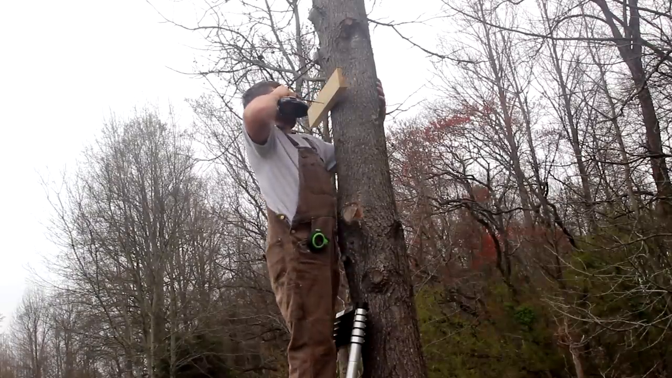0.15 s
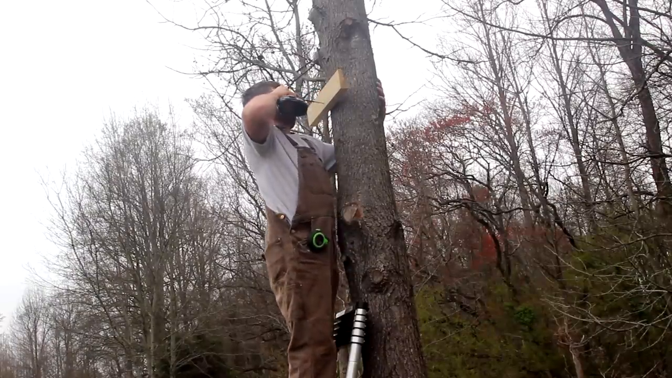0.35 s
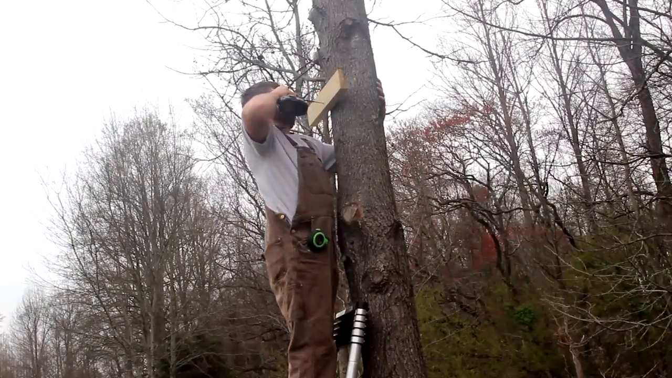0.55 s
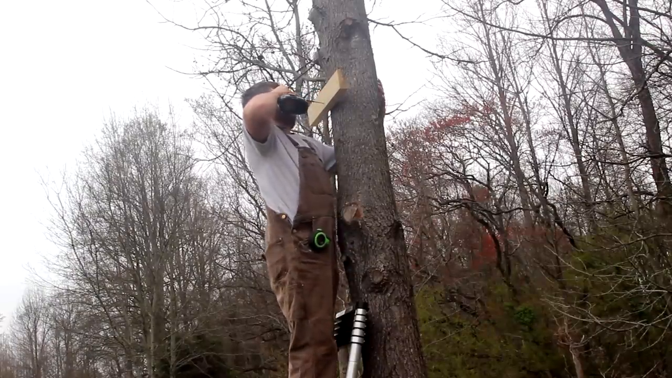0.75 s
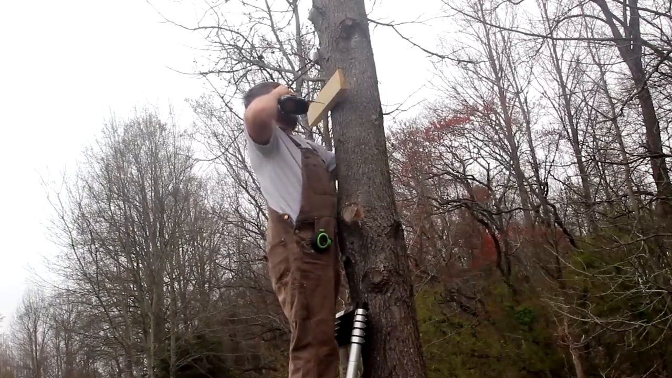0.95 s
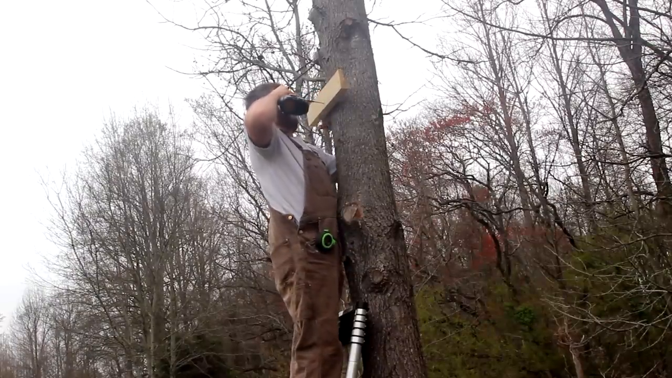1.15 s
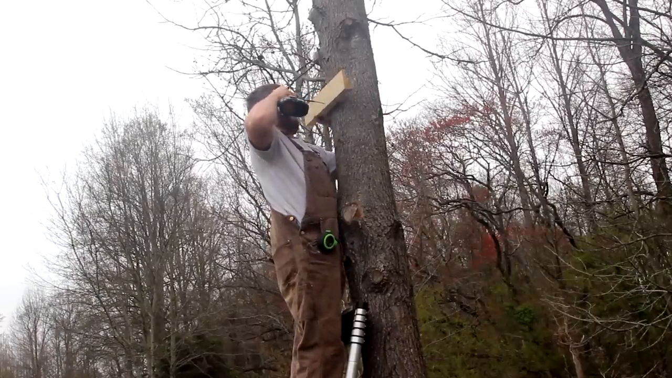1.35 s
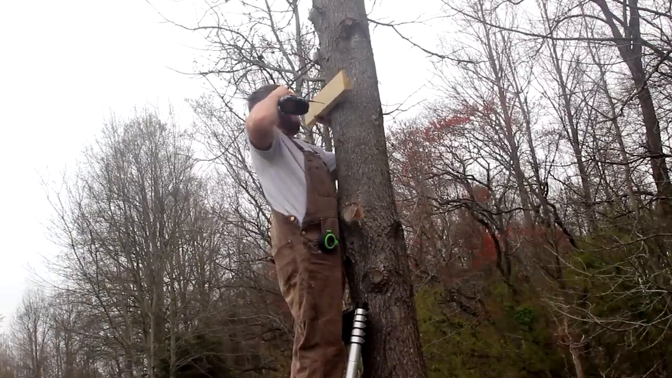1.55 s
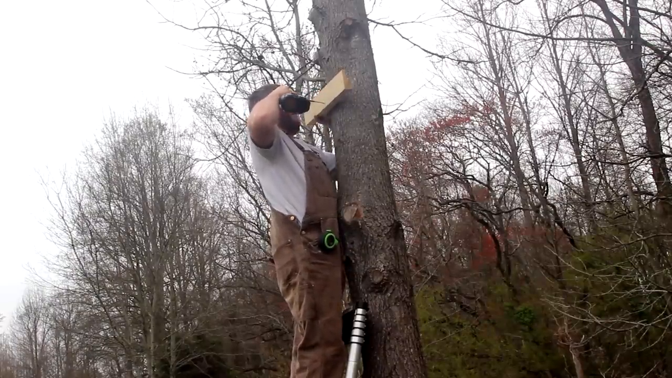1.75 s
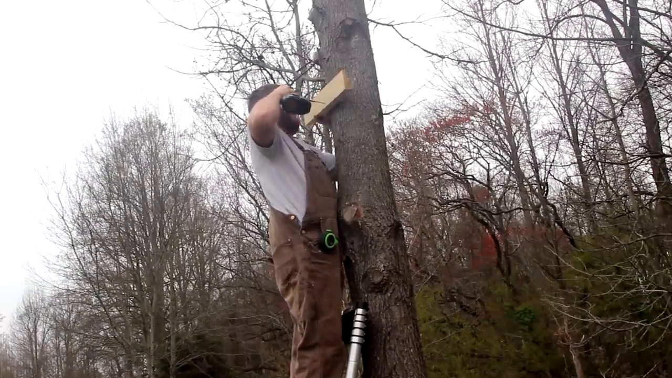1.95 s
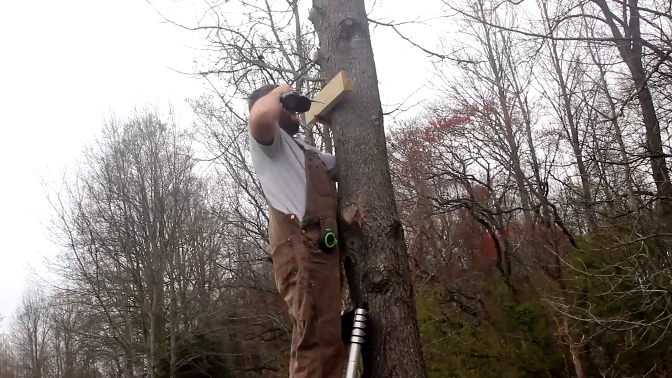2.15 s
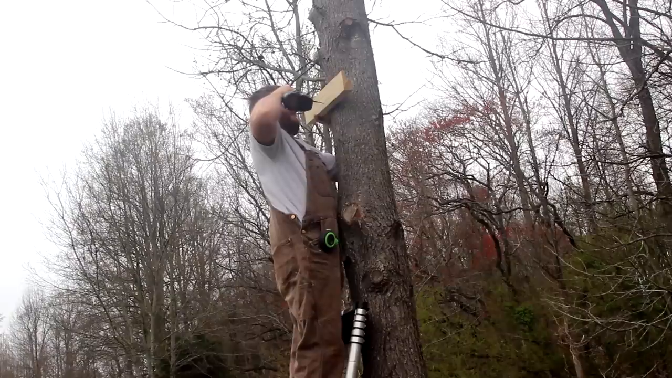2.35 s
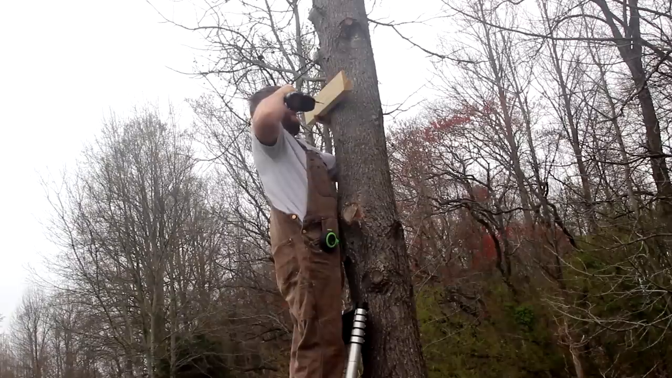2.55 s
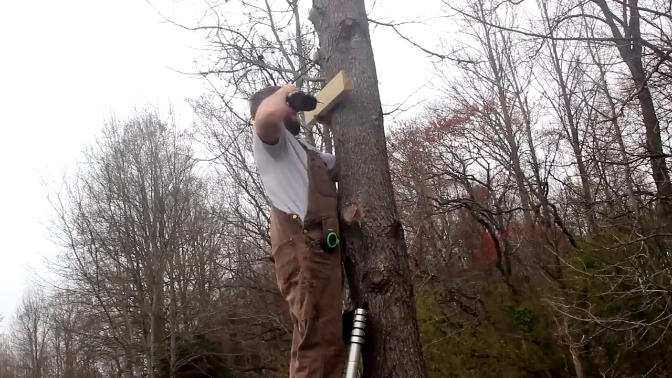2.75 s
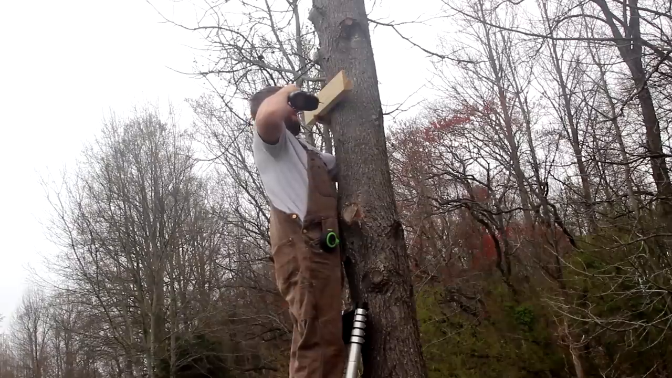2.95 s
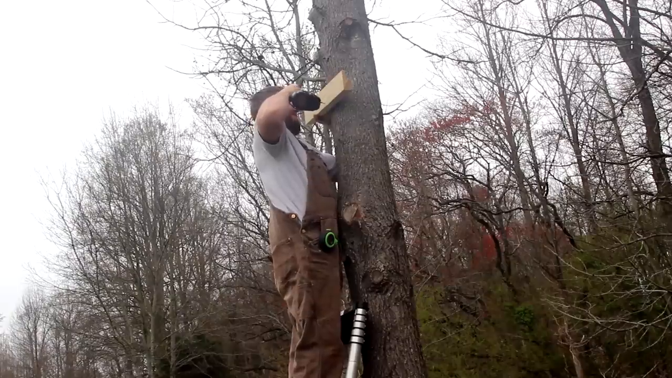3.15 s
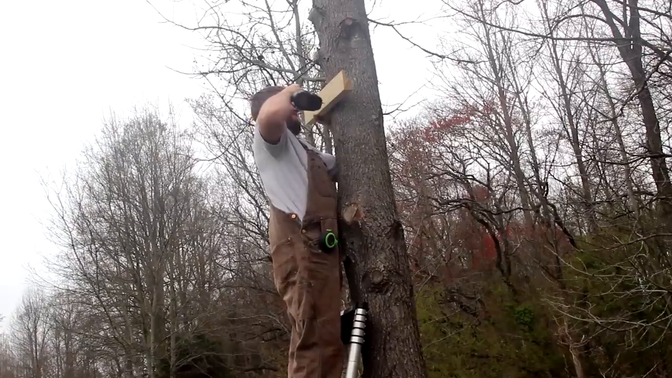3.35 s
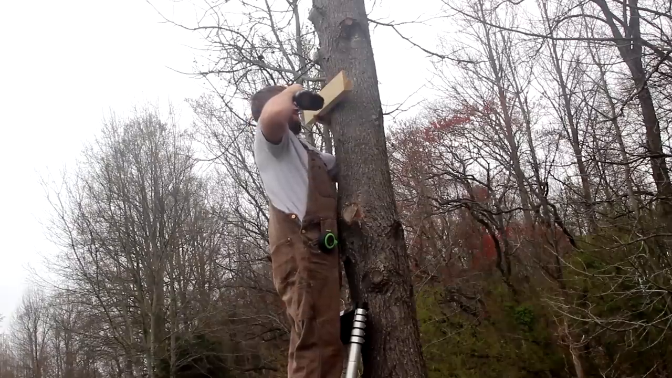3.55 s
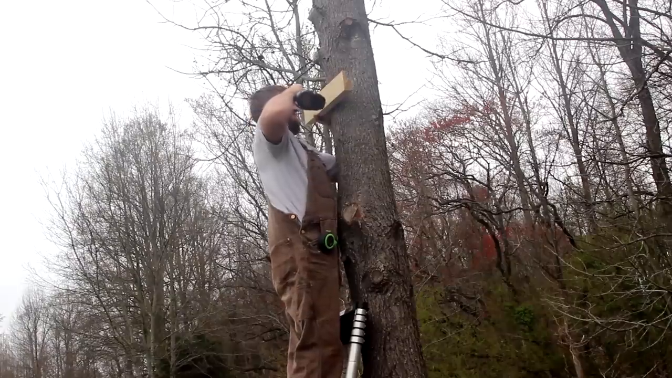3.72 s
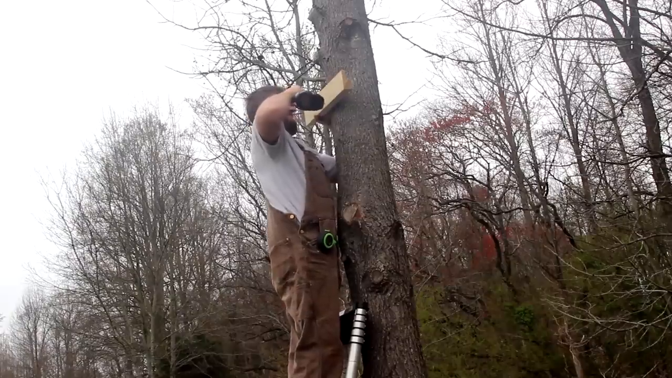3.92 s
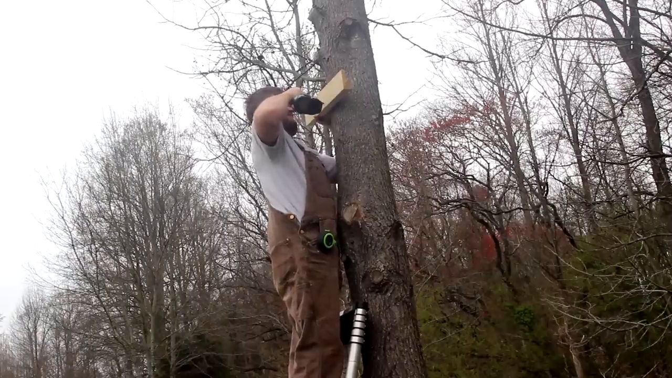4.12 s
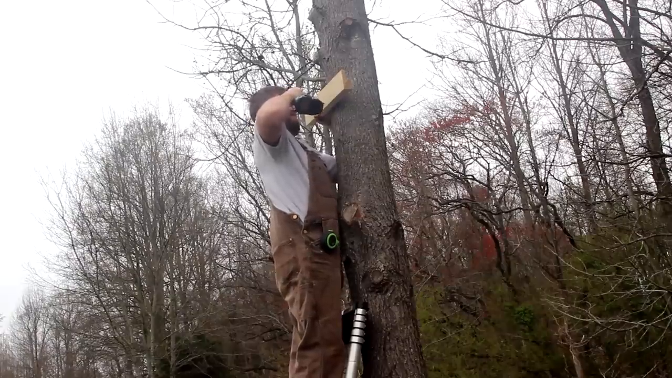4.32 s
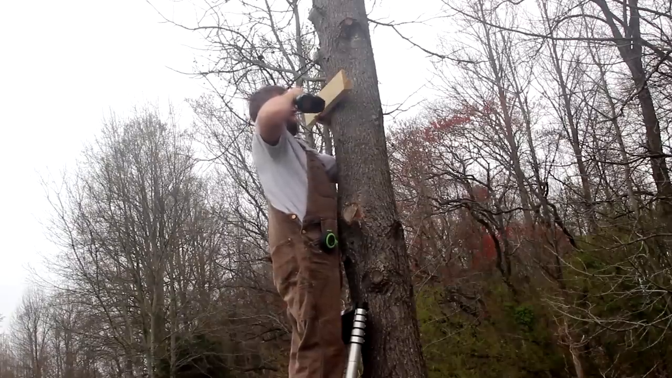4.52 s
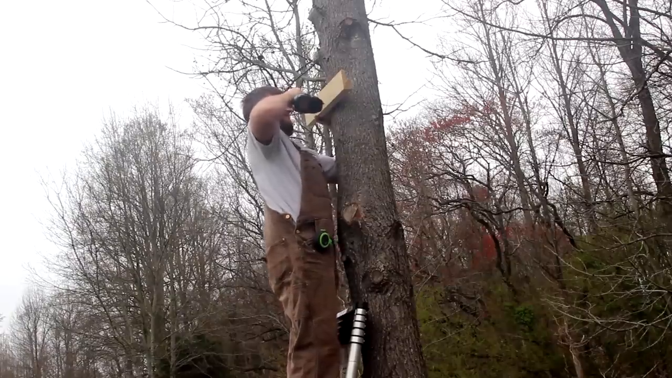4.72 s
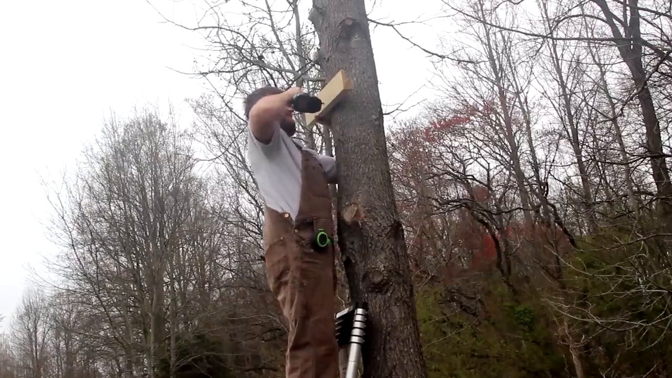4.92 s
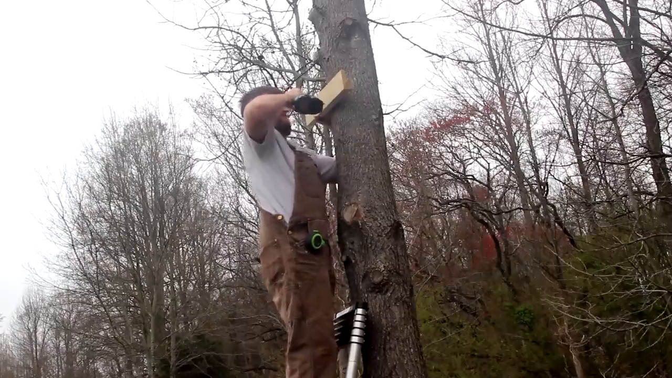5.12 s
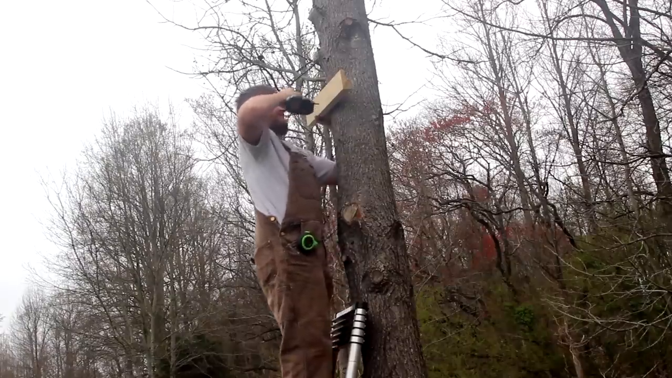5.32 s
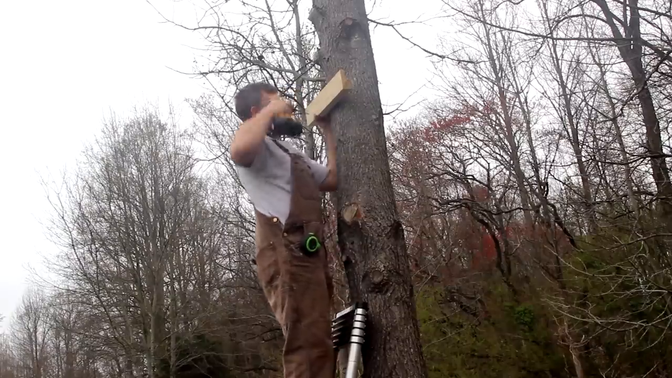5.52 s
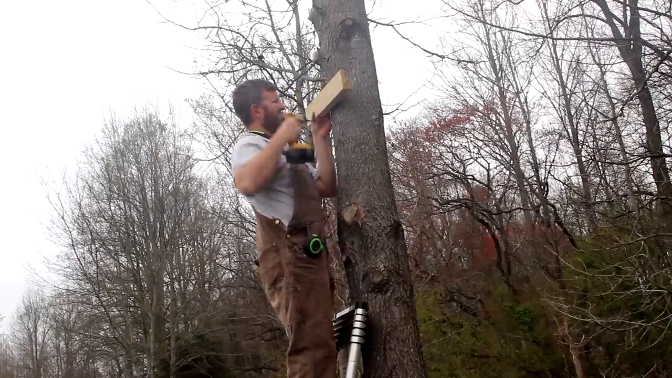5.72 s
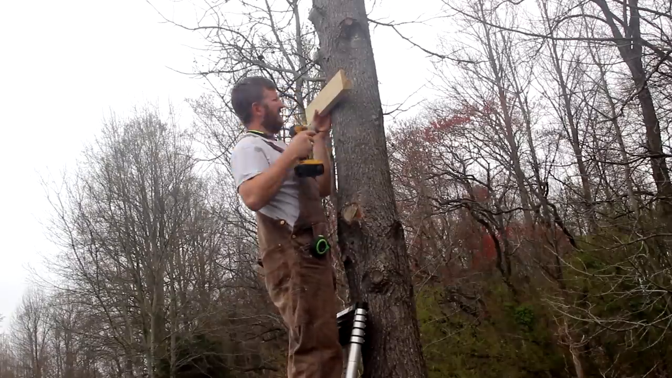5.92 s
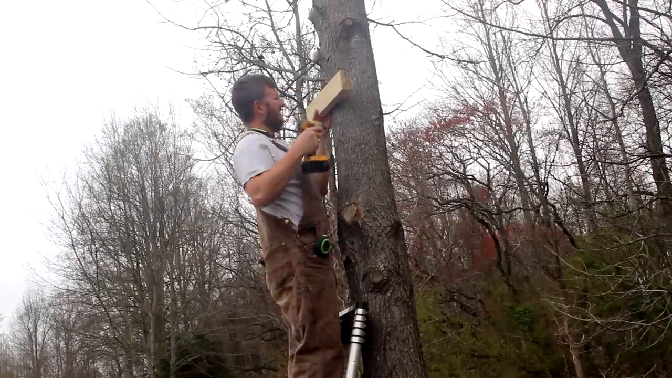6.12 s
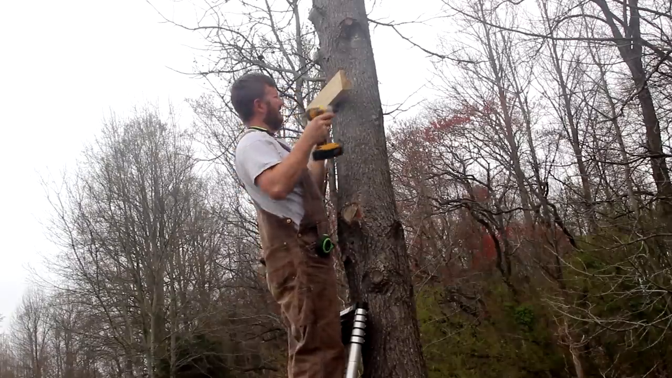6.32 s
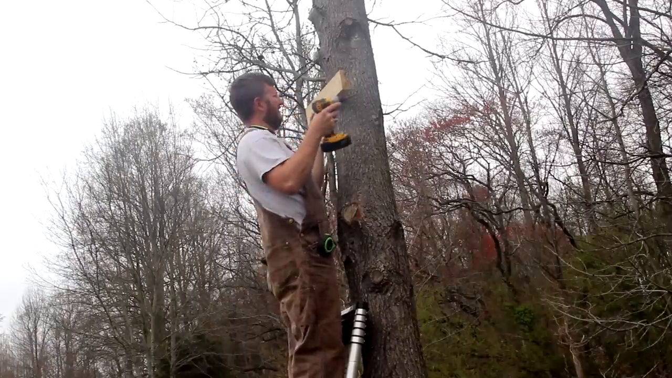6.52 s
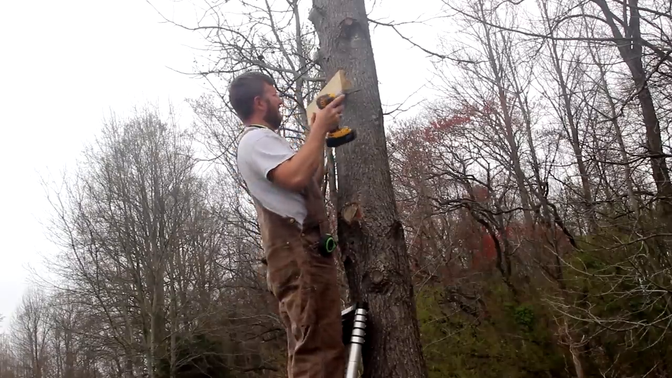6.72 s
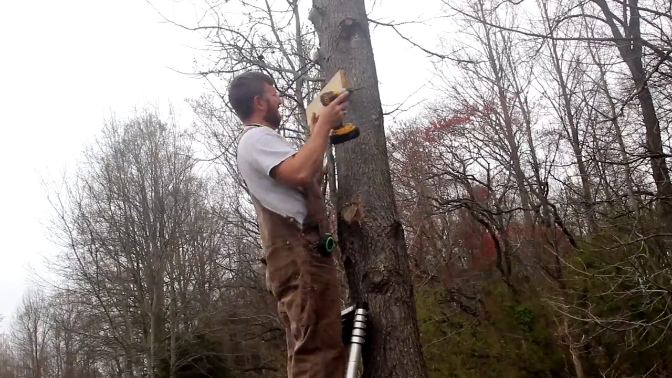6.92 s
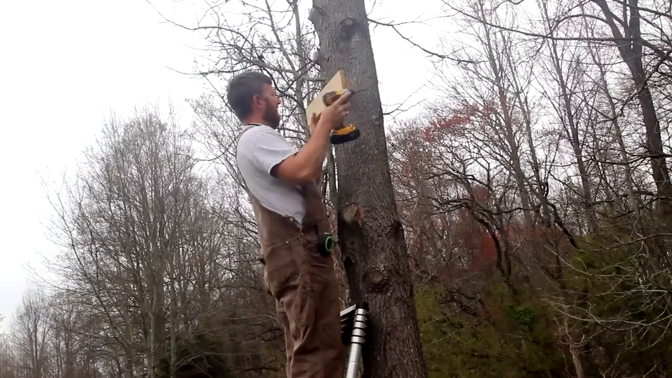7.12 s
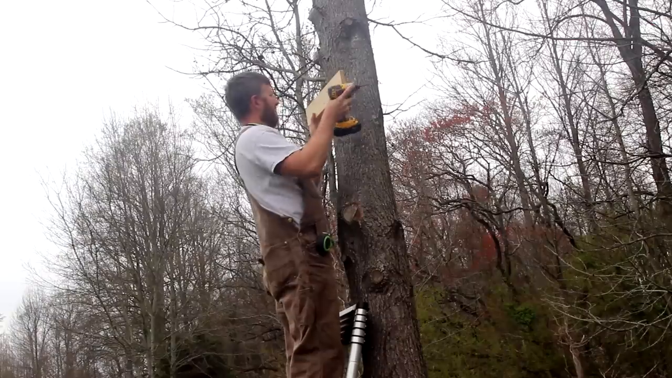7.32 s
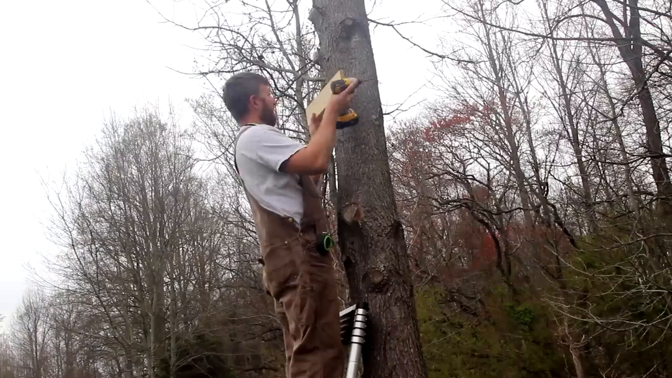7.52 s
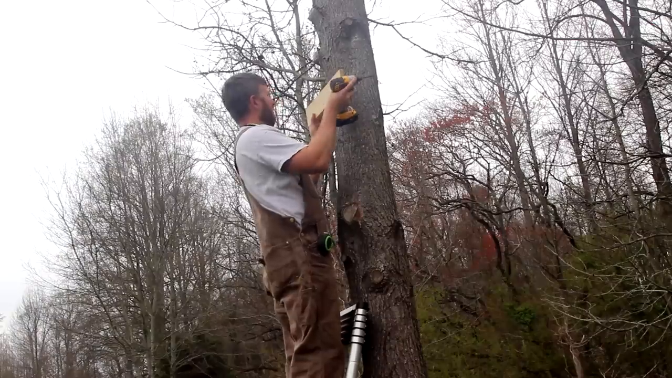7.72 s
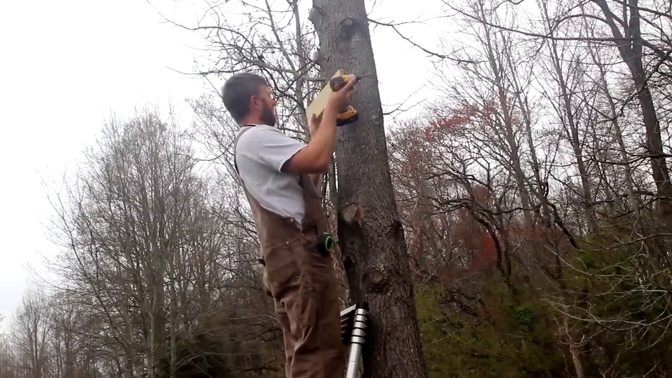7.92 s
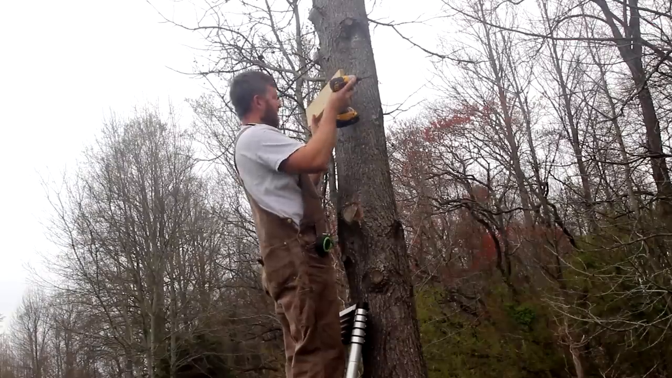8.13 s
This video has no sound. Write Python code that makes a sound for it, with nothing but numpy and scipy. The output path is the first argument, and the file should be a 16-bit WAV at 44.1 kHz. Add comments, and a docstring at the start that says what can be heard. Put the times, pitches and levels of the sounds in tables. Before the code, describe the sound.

In quiet woodland, a few metres from the microphone, a cordless impact driver whirs lightly twice and clicks against a screw head. Loud, rapid metallic hammering follows as the screw sinks into a wooden board, one sustained drive with a brief burst before it and two after. The sound is sharp and almost dry. When the tool stops, distant bird chirps, small ticks and a low engine drone sit over a soft outdoor wash.

```python
"""A cordless impact driver sinks a long screw through a board into a tree, a few metres from a camera.
The motor whines on a light trigger, then the hammer strikes about 35 times a second: one long drive and three short bursts.
Birds and a far engine sound in the woods; the camera's gain control ducks them under the blows."""
import sys
import numpy as np
from scipy import signal
from scipy.fft import rfft, irfft
from scipy.io import wavfile
from scipy.ndimage import uniform_filter1d

SR = 44100
rng = np.random.default_rng(int(sys.argv[2]) if len(sys.argv) > 2 else 0)


def persist_wave(psi):
    """Save psi, clipped to +-1, as 16-bit WAV."""
    counts = np.round(np.clip(psi, -1, 1) * 32767).astype(np.int16)
    wavfile.write(sys.argv[1], SR, np.atleast_2d(counts).T)


N = 364707

# what the board and the driver ring with: (Hz, dB, t60 s)
MODES = [(222, -19, 0.028), (422, -12.5, 0.024), (569, -15, 0.088), (796, -10, 0.078), (1130, -15.5, 0.055), (1208.5, 1, 0.086), (1325, -1.5, 0.028), (1550, 10, 0.0089), (1730, 7, 0.0079), (1780, 7, 0.013), (1879, 8, 0.026), (1960, -1, 0.069), (3640, -12.5, 0.056), (4573, -3, 0.036)]
# colours of the crack, the gears and the woods: (Hz, dB per Hz)
CRACK = [(40, -46), (150, -28), (400, -18.5), (1000, -7.5), (1700, 4), (2250, -3), (3300, 1.5), (4300, 0), (5000, -1), (7200, -2), (9500, -4), (10500, -6.5), (13000, -6), (16000, -12.5)]
GEARS = [(60, -41), (250, -13), (900, -8.5), (1200, 1), (1400, -3), (1930, 0), (2200, -13.5), (3050, -1.5), (4100, -12), (4550, -11.5), (5000, -10), (8500, -12), (11000, -16), (16000, -29)]
WOODS = [(15, -44), (25, -2), (103, -3), (176, -8.5), (257, -8), (301, -7.5), (529, -5.5), (856, -11.5), (1350, -13.5),
         (1460, -16), (2500, -20), (2850, -20), (3090, -21.5), (3350, -21.5), (15000, -31.5)]
WOODS_DB = -51
# the screw squeals in the wood: (s, dB)
SQUEAL = [(2.15, -33), (2.3, -29), (2.65, -25), (3.0, -29), (3.4, -38), (3.9, -37)]
# motor on a light trigger, one table a squeeze: (s, pitch Hz, dB)
WHINES = [[(.315, 5000, -50), (.335, 6080, -58), (.365, 5770, -53), (.398, 5950, -55), (.415, 5740, -51), (.45, 5925, -50), (.68, 5970, -55), (.746, 5760, -55), (.765, 6130, -66), (.815, 6150, -51)],
          [(1.46, 4930, -61), (1.505, 5250, -57), (1.53, 4300, -62), (1.56, 5100, -59), (1.578, 5280, -54), (1.625, 4170, -66)]]
# the bit settling in the screw head: (s, dB, centre Hz, t60 s)
CLICKS = [(.325, -48, 6000, 0.037), (.376, -34, 4060, 0.027), (0.815, -46, 5500, 0.036), (0.829, -50.5, 8500, 0.17), (0.851, -47, 6500, 0.078), (1.484, -37.5, 2400, 0.03), (1.517, -43, 2500, 0.16), (1.607, -39.5, 2030, 0.035), (1.619, -45, 4000, 0.068), (1.643, -41, 1410, 0.16), (1.661, -44, 3500, 0.06), (1.688, -42, 2000, 0.06), (8.235, -51.5, 8000, .06)]
# faint dry ticks in the woods: (s, dB)
TICKS = [(.266, -44), (.498, -45), (.612, -46), (.884, -45.5), (5.617, -41.5), (6.167, -45), (6.384, -46), (6.513, -43.5), (6.636, -44.5), (6.685, -43.5), (6.758, -42), (7.103, -44.5), (7.151, -44), (7.184, -43.5), (7.691, -46.5), (8.119, -43)]
# bird notes: (s, length s, first Hz, last Hz, dB)
BIRDS = [(4.168, 0.026, 3510, 3850, -42.5), (4.385, 0.034, 3680, 3800, -44), (5.368, 0.22, 4360, 4220, -52), (5.53, 0.045, 3400, 3950, -47.5), (6.526, 0.14, 7200, 6660, -58), (6.628, 0.061, 6330, 6000, -56), (6.687, 0.19, 6240, 6460, -55.5), (7.044, 0.08, 3070, 3040, -54), (7.087, 0.22, 2976, 3016, -50.5), (7.1, 0.055, 3820, 4900, -59), (7.157, .045, 4900, 4100, -60)]
# a far engine: (s, dB)
ENGINE = [(0, -78), (.6, -61), (1.2, -70), (1.7, -82), (4.3, -87), (5.3, -66), (5.8, -55.5), (6.5, -56.5), (7.3, -60.5), (8.27, -59.5)]
# the trees' echo: (Hz, t60 s)
TREES = [(200, 0.89), (800, 1.09), (1800, 0.87), (3500, 1.3), (8000, 0.51), (15000, 0.47)]
EDGE_HZ = 16000  # fixed
TIME = np.arange(N) / SR
# the screw itself clanks more as it tightens: (s, dB beside the crack)
TIGHT = [(1.8, -15), (2.6, -19), (3.1, -24), (3.5, -7), (3.9, -7.5), (4.5, -11.5), (5.2, -11.5)]
# the motor's low hum: (s, Hz, dB)
HUM = [(1.5, 141.6, -65), (1.75, 142.2, -57.5), (2.1, 147.8, -48), (2.3, 150.8, -42.5), (2.8, 165, -41.5), (3.201, 194.6, -45), (3.6, 210, -50), (3.92, 206, -52)]
# a far chorus in the woods: (s, dB)
CHORUS = [(0, -69), (5.6, -62.5), (6.5, -61.5), (8.27, -69)]
# the colour of the trees' echo: (Hz, dB per Hz)
ECHO = [(60, -16), (200, 11.5), (560, 3.5), (790, 5), (1200, 0.5), (2000, -0.5), (3200, -5), (4500, -4), (8500, 4), (15000, -4)]
# how firmly the bit sits in the screw, as the lift of the top treble: (s, dB)
SEAT = [(1.8, -6), (2.3, 1.5), (2.7, 2), (3.3, 2.5), (3.9, -2.5), (4.5, -2.5), (5.1, -6)]
# speed of the hammer, one table a pull of the trigger, from the first blow on: (s, blows a second)
RATES = [
    [(1.7946, 32.42), (1.86, 33.54), (1.91, 24.7), (1.955, 54.45)],
    [(2.1854, 33.11), (2.4, 32.64), (2.9, 33.38), (3.22, 33.37), (3.29, 36.46), (3.44, 35.67), (3.85, 40.58),
     (3.92, 33.47)],
    [(4.4788, 20.98), (4.52, 35.78), (4.66, 39.68), (4.715, 27.91)],
    [(5.0401, 28.1), (5.09, 40.34), (5.16, 40.67), (5.21, 32.37)],
]  # fixed
# force of the blows, one table a pull: (s, crack of the steel dB, knock of the board dB)
FORCES = [[(1.795, 4.5, -1.5), (1.887, -1.5, -6), (1.947, -8, -12.5)],
          [(2.185, -1.5, 3), (2.215, -3, -3.5), (2.275, -0.5, -5.5), (2.31, -9, -16), (2.45, -9, -9.5), (2.57, -2, -5.5), (2.68, -8, -13), (3.1, -7.5, -12), (3.45, -5.5, -13.5), (3.65, -9, -19.5), (3.88, -5.5, -14), (3.91, -8.5, -10)],
          [(4.479, 4, -1), (4.515, 0, -9.5), (4.62, -5.5, -11.5), (4.704, -8, -17.5)],
          [(5.04, 5.5, -4), (5.097, 4.5, -14), (5.145, -4.5, -23), (5.2, -3.5, -16)]]
# the pulls: (spin-up before the first blow s, gears dB, graze ahead of each blow dB, thud of the board's low modes dB)
PULLS = [(0.073, -12, -10.5, 2.5), (0.11, -15.5, -27, -3), (0.092, -16.5, -8.5, 2.5), (0.029, -13.5, -15.5, 6.5)]
# as the screw turns, the bit bites hard at regular steps: (from s, to s, every so many blows)
BITES = [(2.2, 3.0, 6), (3.17, 3.6, 4), (3.61, 3.9, 3)]  # fixed
BITE_CRACK_DB, BITE_KNOCK_DB = 3, 4.5
UNEVEN_CRACK_DB, UNEVEN_KNOCK_DB = 1.17, 2.5
GRAZE_LEAD_S, GRAZE_KNOCK_DB = .0065, 2
# each pull opens with a jolt that soon settles
JOLT_S, JOLT_THUD_DB, JOLT_GEARS_DB = 0.071, 5.5, 3
SPIN_UP_DB, RUN_ON_S, COAST_DB_PER_S, GEARS_FOLLOW = 37, 0.016, 520, 0.46
# the loose bit knocks in the screw head as a pull takes hold or lets go: (s, crack dB, knock dB)
JUMPS = [(1.7484, -23.5, -23.5), (1.7769, -31, -10), (1.9675, -24.5, -17), (2.162, -36, -15), (4.9898, -40, -34), (5.0635, -2, -2), (5.216, -16, -31)]
# the motor turns rough as it sags below its smooth pitch
SMOOTH_HZ, ROUGH_PER_HZ = 5900, .0006  # fixed
# what the screw rings with: (Hz, dB, t60 s)
SCREW = [(3060, 7.5, 0.022), (3150, -8, 0.013), (3500, -4, 0.021)]


def gain_of(db):
    """Decibels to amplitude."""
    return 10 ** (np.asarray(db) / 20)


def evened(x):
    """Scales to rms 1."""
    return x / np.sqrt(np.mean(x ** 2) + 1e-20)


def read(points, hz):
    """A spectrum table on a log-frequency axis."""
    f, value = np.transpose(points)
    return np.interp(np.log(hz + 1), np.log(f + 1), value)


def level(rows):
    """Gain over time from (s, dB) rows, silent outside them."""
    s, db = np.transpose(rows)
    return gain_of(np.interp(TIME, s, db)) * (TIME >= s[0]) * (TIME <= s[-1])


def add(mix, s, sound):
    """Mixes a sound in at time s."""
    part = mix[max(round(s * SR), 0):][:len(sound)]
    part += sound[:len(part)]


def band(hz, width_hz, size=N):
    """Noise in one steep resonance."""
    f = np.fft.rfftfreq(size, 1 / SR)
    return evened(irfft(rfft(rng.standard_normal(size)) / (1 + ((f - hz) / width_hz) ** 2), size))


def coloured(x, points, size=2048):
    """Causal filter of unit energy with the given spectrum."""
    log_gain = np.log(gain_of(read(points, abs(np.fft.fftfreq(size, 1 / SR)))))
    taps = np.fft.ifft(np.exp(np.conj(signal.hilbert(log_gain)))).real
    return signal.oaconvolve(x, taps / np.linalg.norm(taps))[:N]


def hammer(crack_t60=0.018, snap=.07, alike=0.48, drift=0.092, clank_vary_db=3, thump_db=-24, thump_hz=340, thump_width_hz=260, thump_t60=0.054, lowest_hz=105):
    """Each blow is a hard snap and a clatter of steel, partly alike each time; it thumps the board and sets board and screw ringing."""
    t = np.arange(SR // 10) / SR
    clatter = np.exp(-np.log(1000) * t / crack_t60)
    steel, share, change = rng.standard_normal(len(t)), np.clip(alike, 0, 1), np.clip(drift, 0, 1)
    cracks, knocks, clanks = np.zeros((3, N))
    for s, steel_db, board_db, thud_db in blows():
        # the clatter slowly changes its colour as the screw sinks
        steel = np.sqrt(1 - change) * steel + np.sqrt(change) * rng.standard_normal(len(t))
        crack = clatter * (np.sqrt(share) * steel + np.sqrt(1 - share) * rng.standard_normal(len(t)))
        # the hammer lands fully a moment after first touch
        crack[SR // 3000] = np.sqrt(abs(snap) * rng.uniform(0, 3.6)) * np.linalg.norm(crack)
        add(cracks, s, gain_of(steel_db) * crack / np.std(crack[:SR // 250]))
        board = ring([(hz, db + thud_db * (hz < 1000), t60) for hz, db, t60 in MODES], t)
        thump = gain_of(thump_db + thud_db) * np.exp(-np.log(1000) * t / thump_t60) * band(thump_hz, thump_width_hz, size=len(t))
        add(knocks, s, gain_of(board_db) * (board + thump))
        clank_db = steel_db + np.interp(s, *np.transpose(TIGHT)) + clank_vary_db * rng.standard_normal()
        add(clanks, s, gain_of(clank_db) * ring(SCREW, t, vary_db=4, detune=0.024))
    # the small board radiates no deep bass
    knocks = signal.sosfilt(signal.butter(4, lowest_hz, "high", fs=SR, output="sos"), knocks)
    return coloured(cracks, CRACK) + knocks + clanks


def gears(mesh_hz=165, chatter=0.28, grit_db=2.0, edge_hz=4500, bite_db=-22):
    """Gears and thread grind in gritty pulses, bright only once the bit bites; the screw squeals as it turns."""
    turns = np.cumsum(mesh_hz * (1 + 0.0564 * band(0, 9.25))) / SR
    grind = rng.standard_normal(N) * (1 + chatter * np.cos(2 * np.pi * turns)) * gain_of(grit_db * band(0, 180))
    grind, load = evened(coloured(grind, GEARS)), gear_load()
    dull = signal.sosfiltfilt(signal.butter(1, edge_hz, fs=SR, output="sos"), grind)
    bright = np.minimum(load / gain_of(bite_db), 1) ** .5
    return load * (dull + bright * (grind - dull)) + level(SQUEAL) * band(4450, 200)


def whine(wobble=.07, rasp=0.6, octave_db=-16):
    """A thin motor tone and its octave, raspy while the bit seeks its seat."""
    out = np.zeros(N)
    for rows in WHINES:
        s, *columns = np.transpose(rows)
        t = np.arange(s[0], s[-1], 1 / SR)
        hz, db = (np.interp(t, s, c) for c in columns)
        rough = np.clip(ROUGH_PER_HZ * (SMOOTH_HZ - hz), 0, 1)
        angle = 2 * np.pi * np.cumsum(hz * (1 + wobble * rough * band(0, 870, size=len(t)))) / SR
        tone = np.sqrt(2) * (np.sin(angle) + gain_of(octave_db) * (1 + 2 * rough) * np.sin(2 * angle))
        tone *= 1 + rasp * rough * band(0, 200, size=len(t))
        add(out, s[0], gain_of(db) * tone * signal.windows.tukey(len(t), .03))
    return out


def small_sounds(click_width=1.0, tick_hz=2150, tick_width_hz=430, tick_t60=0.058, faint_db=-50, count=30):
    """Clicks of the bit and dry ticks among the trees, with fainter ones at random: puffs of noise that die fast."""
    out, t = np.zeros(N), np.arange(SR // 5) / SR
    attack = 1 - np.exp(-t / 0.00024)
    for s, db, hz, t60 in CLICKS:
        add(out, s, gain_of(db) * attack * np.exp(-np.log(1000) * t / t60) * band(hz, click_width * hz, size=len(t)))
    faint = [(when * N / SR, faint_db + 6 * (size - .5)) for when, size in rng.random((count, 2))]
    for s, db in list(TICKS) + faint:
        add(out, s, gain_of(db) * attack * np.exp(-np.log(1000) * t / tick_t60) * band(tick_hz, tick_width_hz, size=len(t)))
    return out


def birds(waver=0.012):
    """Gliding whistles."""
    out = np.zeros(N)
    for s, length, first_hz, last_hz, db in BIRDS:
        hz = np.linspace(first_hz, last_hz, int(length * SR))
        # long notes are held steadier than short chirps
        hz = hz * (1 + waver * min(0.069 / length, 1) * band(0, 120, size=SR)[:len(hz)])
        add(out, s, gain_of(db) * np.sqrt(2) * np.sin(2 * np.pi * np.cumsum(hz) / SR) * signal.windows.hann(len(hz)))
    return out


def woods(patchy_db=.9, engine_hz=108, overtone_hz=262, overtone_db=-6, hiss_db=-68):
    """Distant outdoor wash in drifting patches, a far engine's drone and a thin high hiss."""
    hz, _, z = signal.stft(rng.standard_normal(N), SR, nperseg=2048)
    patches = evened(uniform_filter1d(uniform_filter1d(rng.standard_normal(z.shape), size=14, axis=0), size=6, axis=1))
    wash = signal.istft(z * gain_of(read(WOODS, hz)[:, None] + patchy_db * patches), SR)[1][:N]
    engine = level(ENGINE) * (band(engine_hz, 5.6) + gain_of(overtone_db) * band(overtone_hz, 4.4))
    return gain_of(WOODS_DB) * evened(wash) + engine + gain_of(hiss_db) * band(15660, 80)


def ground(x, delay_s=.0094, echo_db=-12, dull_hz=4000):
    """One bounce off the leafy ground, which soaks up the treble."""
    keep = np.exp(-2 * np.pi * dull_hz / SR)
    dull = signal.lfilter([1 - keep], [1, -keep], x)
    return x + gain_of(echo_db) * np.interp(TIME - delay_s, TIME, dull, left=0)


def trees(x, build_s=0.0092):
    """Scatter from many trunks, the treble dying first."""
    hz, t, z = signal.stft(rng.standard_normal(SR), SR, nperseg=256)
    fade = np.exp(-np.log(1000) * t / read(TREES, hz)[:, None]) * (1 - np.exp(-t / build_s))
    tail = signal.istft(z * fade, SR)[1]
    return signal.oaconvolve(x, tail / np.linalg.norm(tail))[:N]


def hum(throb=0.59, waver=0.012, octave_db=-4, third_db=-3):
    """The motor's low note and its overtones climb through the long drive and throb as the hammer winds up and lets go."""
    s, hz, db = np.transpose(HUM)
    angle = 2 * np.pi * np.cumsum(np.interp(TIME, s, hz) * (1 + waver * band(0, 19.7))) / SR
    swing = 1 + throb * np.sin(2 * np.pi * np.cumsum(np.interp(TIME, *np.transpose(RATES[1]))) / SR)
    tone = np.sin(angle) + gain_of(octave_db) * np.sin(2 * angle) + gain_of(third_db) * np.sin(3 * angle)  # fixed
    return level(np.transpose([s, db])) * swing * tone


def chorus(low_hz=1360, high_hz=2400, high_db=-2):
    """Far calls blur into two soft bands."""
    return level(CHORUS) * (band(low_hz, 49) + gain_of(high_db) * band(high_hz, 270))


def seated(x, edge_hz=10500):
    """Lifts or lowers the top treble with the seat of the bit."""
    top = signal.sosfiltfilt(signal.butter(4, min(edge_hz, SR / 3), "high", fs=SR, output="sos"), x)
    return x + (gain_of(np.interp(TIME, *np.transpose(SEAT))) - 1) * top


def blow_times(rates):
    """The hammer strikes each time it has wound up once."""
    s, per_s = np.transpose(rates)
    t = np.arange(s[0], s[-1], 1 / SR)
    turns = np.cumsum(np.interp(t, s, per_s)) / SR
    return np.interp(np.arange(int(turns[-1]) + 1), turns, t)


def blows():
    """Rows (s, crack dB, knock dB, thud dB): every blow, the graze just ahead of it, and the jumps of the bit."""
    rows = [(*jump, 0) for jump in JUMPS]
    for rates, force, (_, _, graze_db, thud_db) in zip(RATES, FORCES, PULLS):
        s = blow_times(rates)
        at, crack, knock = np.transpose(force)
        jolt, bite = np.exp((s[0] - s) / JOLT_S), np.zeros(len(s))
        for start, end, every in BITES:
            bite[np.flatnonzero((s > start) & (s < end))[::int(every)]] = 1
        shared, own, early = rng.standard_normal((len(s), 3)).T * (1 - jolt)
        crack = np.interp(s, at, crack) + BITE_CRACK_DB * bite + UNEVEN_CRACK_DB * shared
        knock = np.interp(s, at, knock) + BITE_KNOCK_DB * bite + UNEVEN_KNOCK_DB * (shared + own) / np.sqrt(2)
        thud = thud_db + JOLT_THUD_DB * jolt
        rows += zip(s, crack, knock, thud)
        rows += zip(s - GRAZE_LEAD_S * (1 + early / 10), crack + graze_db - GRAZE_KNOCK_DB, knock + graze_db + GRAZE_KNOCK_DB * (1 - 2 * jolt), thud)
    return rows


def gear_load():
    """In each pull the gears spin up, jolt, follow the force of the blows and coast to rest."""
    load = np.zeros(N)
    for rates, force, (spin_up_s, gears_db, _, _) in zip(RATES, FORCES, PULLS):
        s = blow_times(rates)
        at, _, knock = np.transpose(force)
        db = gears_db + GEARS_FOLLOW * np.interp(TIME, at, knock) + JOLT_GEARS_DB * np.exp(-abs(TIME - s[0]) / JOLT_S)
        db -= SPIN_UP_DB * np.maximum(s[0] - TIME, 0) / spin_up_s + COAST_DB_PER_S * np.maximum(TIME - s[-1] - RUN_ON_S, 0)
        load += gain_of(np.maximum(db, -200))  # fixed
    return load


def ring(modes, t, vary_db=2.0, detune=0.007, rise_s=0.0012):
    """Modes of a struck part, of rms 1 at first; the bit meets the screw a little differently every time."""
    hz, db, t60 = np.transpose(modes)[:, :, None]
    size, shift, stretch = rng.standard_normal((3, *hz.shape))
    angle = 2 * np.pi * hz * (1 + detune * stretch) * t + np.pi * np.arange(len(hz))[:, None] + 0.85 * shift
    sound = (1 - np.exp(-t / rise_s)) * (gain_of(db + vary_db * size) * np.exp(-np.log(1000) * t / t60) * np.sin(angle)).sum(0)
    return sound / np.std(sound[:SR // 150])


def scene(driver_wet_db=-28, bird_dry_db=-2, bird_wet_db=-7):
    """The near driver is almost dry; the birds are far and wet."""
    driver = ground(seated(hammer() + gears()) + hum() + whine() + small_sounds())
    song = birds()
    echo = trees(gain_of(driver_wet_db) * coloured(driver, ECHO) + gain_of(bird_wet_db) * song)
    return (driver + gain_of(bird_dry_db) * song + echo + woods() + chorus())[None]


def record(dry, threshold_db=-42, squeeze=0.41, recover_db_per_s=30, sense_s=0.023, hiss_db=-71):
    """Gain control falls quickly and recovers slowly; then the converter's hiss, full scale and the band limit."""
    keep = np.exp(-1 / (sense_s * SR))
    power_db = 10 * np.log10(signal.lfilter([1 - keep], [1, -keep], dry[0] ** 2) + 1e-12)
    fall = recover_db_per_s * TIME
    duck_db = np.maximum.accumulate(squeeze * np.maximum(power_db - threshold_db, 0) + fall) - fall
    ducked = dry / gain_of(duck_db) + gain_of(hiss_db) * rng.standard_normal(N)
    ducked = np.clip(ducked, -.9, .9)  # fixed
    return signal.oaconvolve(ducked, signal.firwin(255, EDGE_HZ, window=("kaiser", 8), fs=SR)[None], "same")  # fixed


dry = scene()
out = record(dry)
persist_wave(out)
```